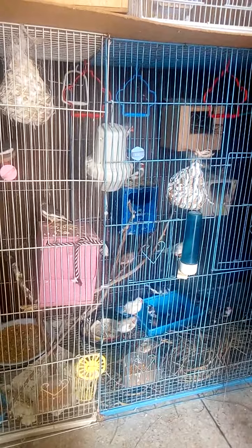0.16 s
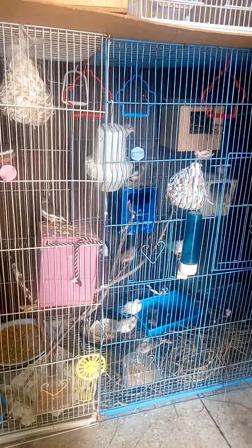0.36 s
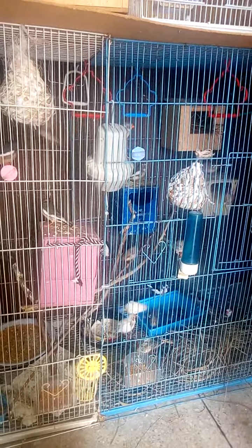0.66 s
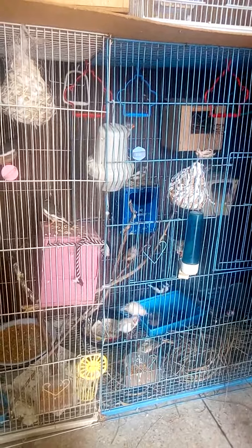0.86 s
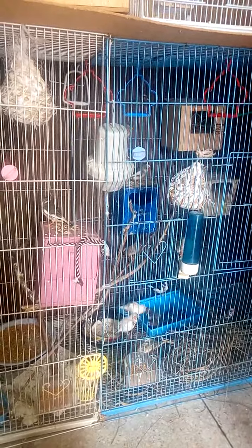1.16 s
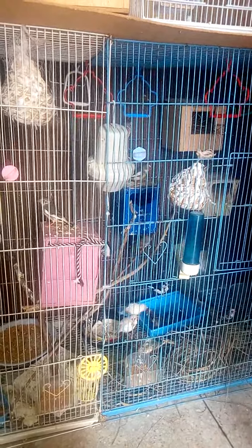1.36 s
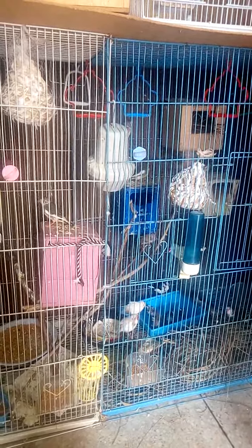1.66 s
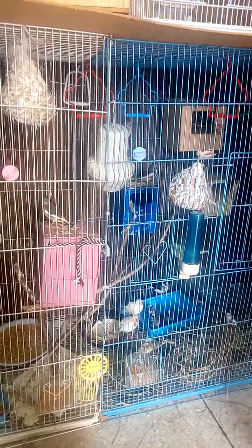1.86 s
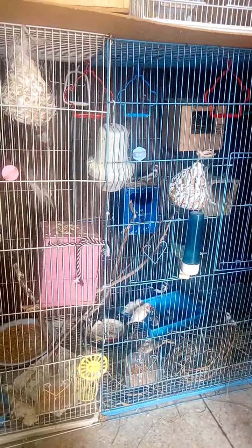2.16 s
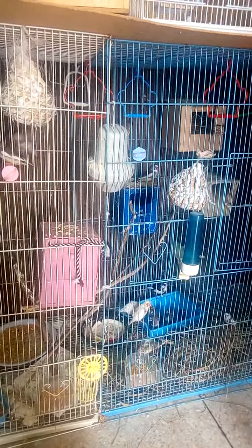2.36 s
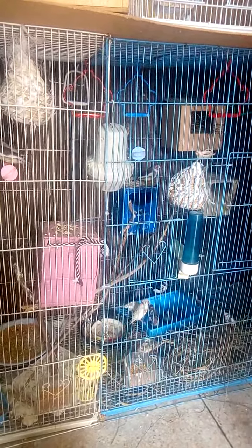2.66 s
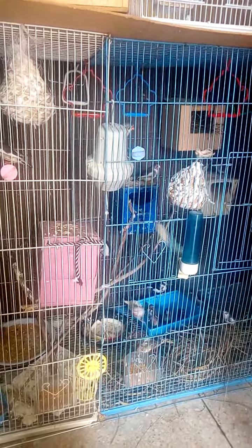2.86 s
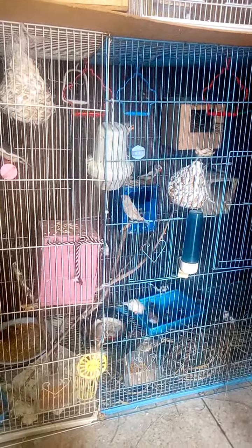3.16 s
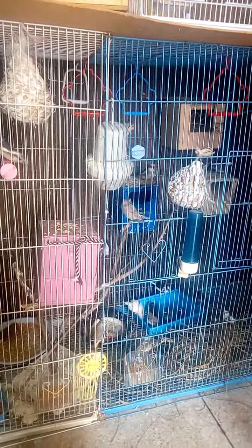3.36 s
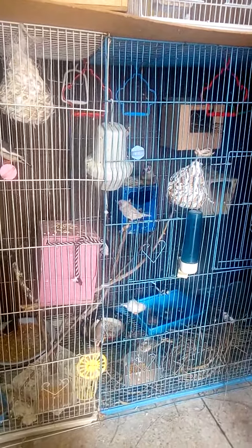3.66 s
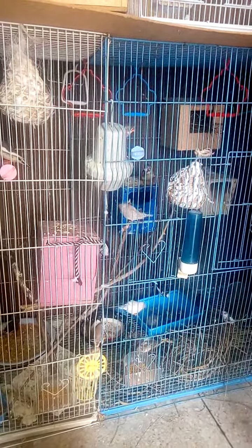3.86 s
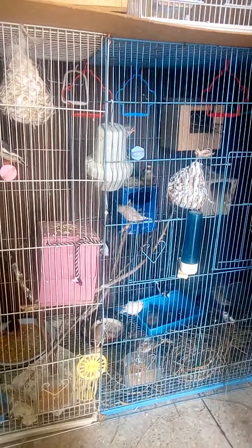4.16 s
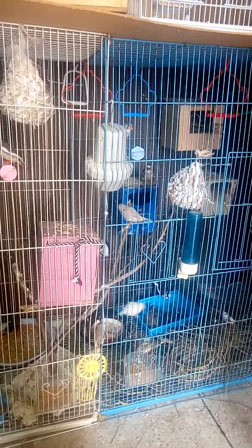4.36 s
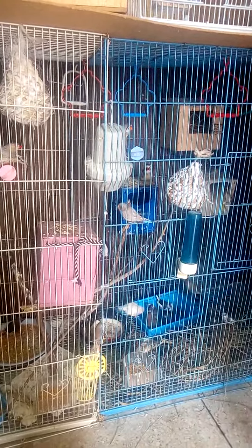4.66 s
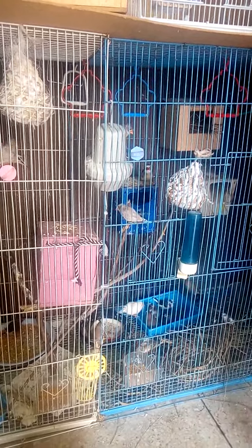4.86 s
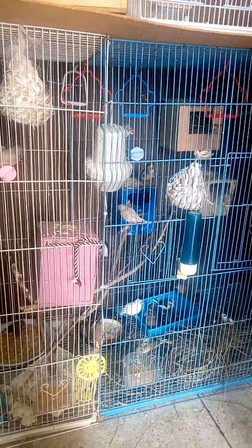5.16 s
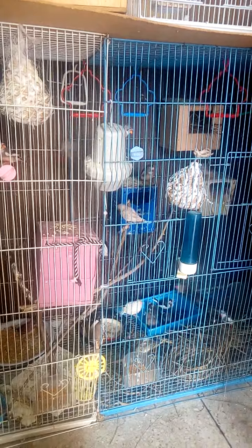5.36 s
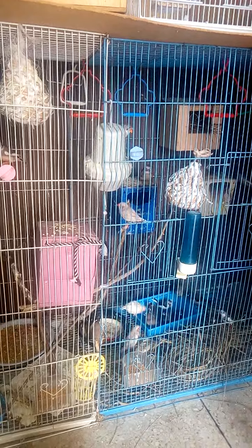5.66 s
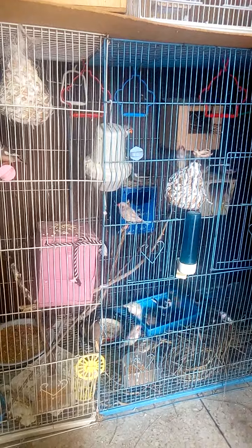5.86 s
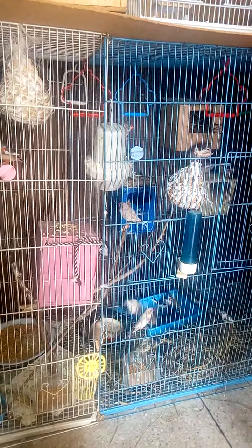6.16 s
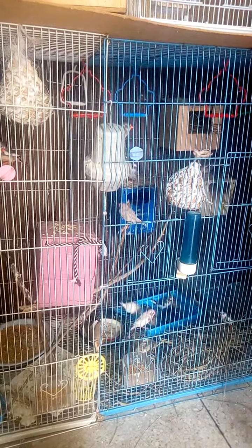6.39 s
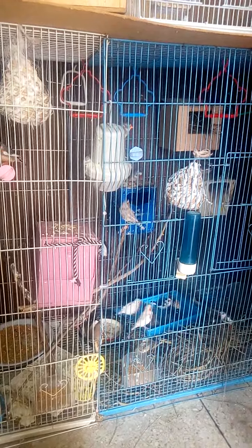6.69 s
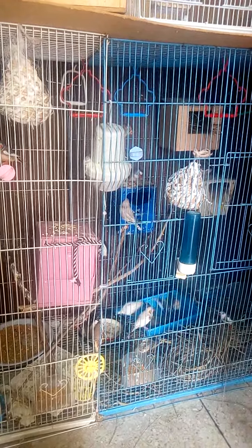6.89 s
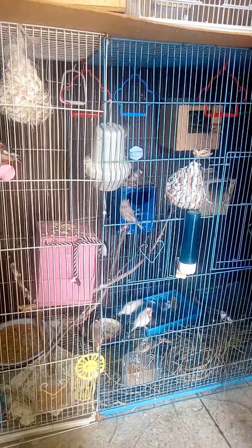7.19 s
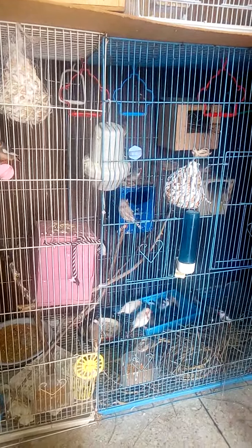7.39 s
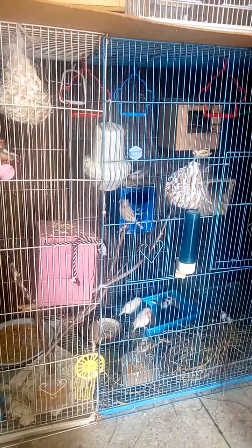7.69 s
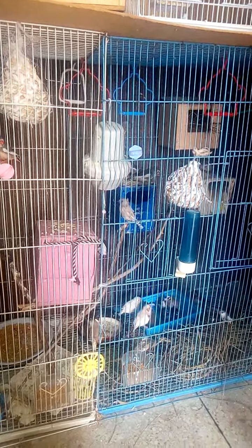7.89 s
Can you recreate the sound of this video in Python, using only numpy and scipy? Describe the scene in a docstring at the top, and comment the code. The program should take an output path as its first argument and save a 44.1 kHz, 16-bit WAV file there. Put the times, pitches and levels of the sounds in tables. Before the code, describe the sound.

Small finches in wire cages chirp in quick bursts, whistle a repeated arched call, nasally beep and rasp in a small hard-floored echoing room.

```python
"""In a small hard-floored room, finches call in wire cages.
One repeats a long arched whistle; others chirp, warble, give soft nasal calls and scold in harsh rasps.
Voices are harmonic tones on moving pitches, with rasps and wheezes of coloured noise.
The cage ticks and thrums faintly as the birds hop about: dry cracks, ringing wires, low panel modes.
Faint twittering and a wing beat pass over quiet air noise, and short echoes surround the calls."""
import sys
import numpy as np
from scipy import signal
from scipy.fft import rfft, irfft
from scipy.io import wavfile
from scipy.ndimage import map_coordinates

SR = 44100
rng = np.random.default_rng(int(sys.argv[2]) if len(sys.argv) > 2 else 0)


def int16_out(signal):
    """Quantize to a 16-bit WAV file."""
    q = np.round(np.clip(np.atleast_2d(signal).T, -1, 1) * 32767)
    wavfile.write(sys.argv[1], SR, q.astype(np.int16))


N = 354123
TIME = np.arange(N) / SR


def from_db(db):
    """Decibels to gain."""
    return 10 ** (np.asarray(db) / 20)


def rms_one(x):
    """Scale to unit power."""
    return x / np.sqrt(np.mean(x ** 2) + 1e-20)


def add(out, s, sound):
    """Mix a sound in at time s."""
    at = max(round(s * SR), 0)
    out[at:at + len(sound)] += sound[:max(N - at, 0)]


def progress(length):
    """Share 0-1 of a note gone by at each sample."""
    return np.linspace(0, 1, int(length * SR))


def wander(size, rate):
    """Smooth random curve around 0 through rate chance values a second, each of unit spread."""
    points = rng.standard_normal(size=4096)
    return map_coordinates(points, [np.arange(size) * rate / SR], order=3, mode="mirror")


def gate(u, edge):
    """Soft opening and closing over a share edge of the note."""
    return np.sin(np.pi / 2 * np.clip(np.minimum(u, 1 - u) / edge, 0, 1)) ** 2


def noise(spectrum):
    """Noise of a given colour, drawn on a log frequency axis, rms 1."""
    hz, db = np.transpose(spectrum)
    bins_hz = np.arange(N // 2 + 1) * SR / N
    gain = from_db(np.interp(np.log(bins_hz + 1), np.log(hz), db))   # + 1 avoids log 0
    return rms_one(irfft(rfft(rng.standard_normal(N)) * gain, N))


def syrinx(hz, partials_db):
    """Voice of a bird: a harmonic tone on a pitch track, without partials above SR / 2, rms 1."""
    phase = 2 * np.pi * np.cumsum(hz) / SR
    tone = 0
    for k, db in enumerate(partials_db, 1):
        tone = tone + from_db(db) * np.sin(k * phase) * (k * hz < SR / 2)
    return rms_one(tone)


# colour of the still air: f/Hz, relative level/dB [dB per Hz]
AIR_COLOUR = [(18, -64.5), (30, -26.5), (150, -8), (807, -15), (4190, -16.5), (6530, -29), (9660, -35.5),
              (15500, -40.5)]


def air(level_db=-55.5):
    """Still air: a steady, quiet coloured noise."""
    return from_db(level_db) * noise(AIR_COLOUR)


# partials of a chirp at multiples of half the main pitch: level/dB, odd ones before the roughness
CHIRP_PARTIALS_DB = [-19.5, 1, -7, -33.5, -26, -46.5]


def chirp_tone(hz, rough, jitter_hz=700, trill_hz=62):
    """A rough syrinx trills, jitters, scratches and doubles its period, adding lines between harmonics."""
    jitter, trill, flutter = .02, .15, .38   # depths, the first two as shares of the pitch
    scratch_db, scratch_ratio, scratch_spread, scratch_hz = -12, .86, .15, 2500
    size = len(hz)
    halfway_db = 30 * np.log10(rough + 0.046)   # level change of the lines between the harmonics
    partials_db = [db + halfway_db * (k % 2) for k, db in enumerate(CHIRP_PARTIALS_DB, 1)]
    bend = jitter * wander(size, jitter_hz) + trill * np.cos(2 * np.pi * trill_hz * TIME[:size])
    tone = syrinx(hz / 2 * (1 + rough * bend), partials_db)
    # a tone with a fast ragged pitch turns to hiss
    scratch = syrinx(scratch_ratio * hz * (1 + scratch_spread * wander(size, scratch_hz)), [0])
    tone = tone + rough * from_db(scratch_db) * scratch
    return tone * (1 + flutter * rough * wander(size, jitter_hz))


# quick chirps: t/s, length [s], start f/Hz, goal f/Hz, level/dB, roughness [0-1]
CHIRPS = [(0.0, 0.0045, 3680, 2950, -26.5, 0.6), (0.528, 0.036, 3340, 3586, -17.5, 0.66),
          (0.563, 0.036, 4337, 3254, -15, 0.34), (0.6, 0.045, 3500, 2930, -23, 0.75),
          (1.034, 0.048, 3060, 3930, -25, 0.78), (1.061, 0.05, 2002, 3020, -23, 0.23),
          (1.111, 0.023, 2350, 2870, -22, 0.42), (1.541, 0.041, 4080, 4530, -33, 0.36),
          (1.59, 0.036, 5040, 4126, -16.5, 0.26), (1.611, 0.047, 2764, 3910, -16, 0.35),
          (1.669, 0.053, 5200, 3230, -18, 0.03), (2.522, 0.052, 3177, 3570, -26.5, 0.84),
          (2.556, 0.05, 3170, 2584, -29.5, 0.72), (3.004, 0.069, 4040, 3454, -32.5, 0.27),
          (4.429, 0.097, 1707, 1865, -37.5, 0), (5.596, 0.046, 3880, 2944, -31.5, 0.94),
          (5.767, 0.03, 6260, 5700, -44, 0.15), (5.795, 0.064, 4000, 3037, -28, 0.23),
          (6.78, 0.051, 5350, 4280, -29.5, 0.2), (6.865, .05, 2340, 3000, -44, .2),
          (6.912, 0.039, 6660, 4170, -35, 0.32), (7.173, 0.02, 4190, 3840, -25.5, 0.08),
          (7.199, 0.026, 5150, 4430, -25, 0.16), (7.227, 0.028, 2830, 4030, -16.5, 0.12),
          (7.294, 0.054, 2710, 3744, -20, 0.2), (7.298, 0.0089, 4880, 5580, -22, 0),
          (7.856, 0.03, 3280, 3680, -29, 0.48), (7.893, 0.028, 2583, 3273, -23.5, 0.65),
          (7.955, 0.018, 3384, 3319, -20.5, 0.14), (8.001, 0.042, 2290, 3630, -24, 0.14)]


def chirps(turn_share=.93):
    """Short notes that swoop up or down to a goal pitch, fast at first, and bend back a little."""
    out = np.zeros(N)
    for s, length, start_hz, goal_hz, db, rough in CHIRPS:
        u = progress(length)
        hz = goal_hz + (start_hz - goal_hz) * (1 - u / turn_share) ** 2
        add(out, s, from_db(db) * gate(u, edge=.2) * chirp_tone(hz, rough))
    return out


# colour of claws and seed husks: f/Hz, relative level/dB [dB per Hz]
TICK_COLOUR = [(600, -11.5), (2000, 6), (9000, -15.5), (15500, -21)]


def ticks(ticks_per_s=12, level_db=-47.5, spread_db=4, t60_s=.0033):
    """Claws and seed husks: tiny dry cracks of uneven size at random moments, each a burst of noise."""
    struck = rng.random(N) < ticks_per_s / SR
    cracks = struck * from_db(level_db + spread_db * rng.standard_normal(N))
    decay_per_sample = from_db(-60 / (t60_s * SR))
    # the tiny offset keeps the decay clear of vanishing numbers
    return signal.lfilter([1], [1, -decay_per_sample], cracks + 1e-18) * noise(TICK_COLOUR)


# low thrums of the cage panels: t/s, length [s], f/Hz, level/dB before the swells
THRUMS = [(.35, 0.5, 139.8, -56), (0.946, 0.5, 233.7, -52), (1.666, 0.3, 232, -51.5),
          (2.62, 0.53, 233, -54.5), (5.332, 0.38, 236, -51), (7.04, 0.29, 236.5, -53.5)]


def thrums(width_hz=50, overtone_db=-10):
    """Small shakes keep a low panel mode and a weaker neighbour ringing unevenly."""
    out = np.zeros(N)
    for s, length, hz, db in THRUMS:
        u = progress(length)
        for mode_hz, mode_db in [(hz, 0), (hz * 1.35, overtone_db)]:
            shake = wander(len(u), width_hz) + 1j * wander(len(u), width_hz)
            ringing = rms_one(np.real(shake * np.exp(2j * np.pi * mode_hz * u * length)))
            swells = from_db(4 * wander(len(u), 20.5))
            add(out, s, from_db(db + mode_db) * gate(u, 0.23) * swells * ringing)
    return out


# soft nasal calls: t/s, length [s], level/dB, brightest f/Hz, pitch f/Hz before arch and sag
NASAL_CALLS = [(0.664, 0.12, -38.5, 3920, 539), (0.826, 0.13, -38.5, 3060, 558),
               (1.311, 0.097, -38.5, 3270, 553), (2.694, 0.059, -35, 4700, 644.4),
               (2.87, 0.15, -40, 3270, 492), (3.304, 0.087, -30.5, 2650, 495.4),
               (3.611, 0.076, -41.5, 3570, 516.6), (4.867, 0.15, -26, 3560, 571.6),
               (5.954, 0.116, -38, 4260, 556.5), (6.421, 0.05, -29, 4380, 604.5),
               (6.492, 0.25, -32.5, 4530, 630.4), (6.684, 0.14, -25.5, 4530, 687),
               (7.034, 0.094, -28.5, 4280, 607)]


def nasal_calls(slope_db=15, beak_hz=5400, beak_cut_db=70):
    """Low-pitched harmonic stacks arch and sag, rough at both ends, shaped by one broad throat resonance."""
    out = np.zeros(N)
    arch, sag, jitter, uneven_db = .1, .07, .04, 4   # the first three scale shares of the pitch
    for s, length, db, bright_hz, pitch_hz in NASAL_CALLS:
        u = progress(length)
        ends = (2 * u - 1) ** 2   # 1 at both ends, 0 in the middle
        roughness = jitter * (ends + .2) * wander(len(u), 900)
        hz = pitch_hz * (1 - arch * ends - sag * (u - .5) + roughness)
        lines = pitch_hz * np.arange(1, 19)
        # slopes in dB per octave: around the resonance, then the extra cut above beak_hz
        shape = -slope_db * np.abs(np.log2(lines / bright_hz))
        shape = shape - beak_cut_db * np.maximum(np.log2(lines / beak_hz), 0)
        shape = shape - 25 * np.maximum(np.log2(1600 / lines), 0)   # a tiny throat radiates little bass
        partials_db = [level + uneven_db * wander(len(u), 2 / length) for level in shape]
        add(out, s, from_db(db) * gate(u, edge=.38) * syrinx(hz, partials_db))
    return out


# feet and beaks on the cage: t/s, level/dB before the mode levels
TAPS = [(0.971, -35), (1.971, -27.5), (2.529, -36)]
# ringing modes of the cage wires: f/Hz, mean level/dB, t60 [s]
WIRE_MODES = [(1480, -23, 0.014), (1840, 6, 0.026), (2030, 6.5, 0.017), (3350, 7, 0.031)]


def taps(wire_low_hz=1070):
    """Each touch of foot or beak rings the wires, every mode with a chance strength and its own decay."""
    out, t = np.zeros(N), TIME[:SR // 5]
    for s, db in TAPS:
        for hz, mode_db, t60 in WIRE_MODES:
            ring_db = db + mode_db + rng.normal(0, 2.9) - 60 * t / t60
            add(out, s, from_db(ring_db) * np.sin(2 * np.pi * hz * t))
    # thin wires radiate little bass
    return signal.sosfilt(signal.butter(2, wire_low_hz, "high", fs=SR, output="sos"), out)


def puffs(rows, colour):
    """Soft swells of rushing air, from a throat or from wings."""
    push = np.zeros(N)
    for s, length, db in rows:
        add(push, s, from_db(db) * gate(progress(length), 0.19))
    return push * noise(colour)


# thin wheezy calls: t/s, length [s], level/dB
WHEEZES = [(1.17, 0.12, -44), (3.85, .17, -36.5)]
# wheeze colour: f/Hz, relative level/dB [dB per Hz]
WHEEZE_COLOUR = [(1200, -14.5), (3500, -4.5), (5400, 13), (8500, -34)]


def wheezes():
    """Thin breaths through a throat, noise without a pitch."""
    return puffs(WHEEZES, WHEEZE_COLOUR)


# harsh scolds: t/s, length [s], level/dB before swell and grain, mean throat resonance f/Hz
RASPS = [(1.722, 0.041, -27.5, 6160), (1.87, 0.035, -32, 6030), (1.975, 0.08, -28.5, 5600),
         (2.11, 0.094, -31.5, 5460), (2.224, 0.099, -27.5, 5560), (2.359, 0.056, -27, 5200),
         (4.762, 0.084, -28, 5270), (5.205, 0.069, -29, 3970), (5.321, 0.061, -28.5, 3700),
         (7.68, 0.1, -30, 4800)]
# rasp hiss colour: f/Hz, relative level/dB [dB per Hz]
RASP_COLOUR = [(900, -57), (1650, -22.5), (2390, -17), (3620, -7), (4760, -6), (6800, -11.5), (7850, -24),
               (11500, -29), (15500, -40)]


def rasps(swell_db=10, throat_db=-3, throat_width_hz=1100, treble_hz=7600):
    """Grainy hisses swell and fade; effort lifts the throat resonance and lets the treble out at its height."""
    out, hiss = np.zeros(N), noise(RASP_COLOUR)
    treble = signal.sosfiltfilt(signal.butter(8, treble_hz, "high", fs=SR, output="sos"), hiss)
    grain_db, grain_hz, lift = 5, 330, .2
    for s, length, db, throat_hz in RASPS:
        u = progress(length)
        during = int(s * SR) + np.arange(len(u))
        effort = np.sin(np.pi * u ** 1.2)
        push_db = db + swell_db * (effort - 0.5) + grain_db * wander(len(u), grain_hz)
        push = gate(u, 0.033) * from_db(push_db)
        resonance_hz = throat_hz * (1 + lift * (effort - effort.mean()))
        phase = 2 * np.pi * np.cumsum(resonance_hz) / SR
        # two random curves spread the resonance into a band of noise
        ringing = wander(len(u), throat_width_hz) * np.sin(phase)
        ringing = ringing + wander(len(u), throat_width_hz) * np.cos(phase)
        breath = hiss[during] - (1 - effort ** 2) * treble[during]
        add(out, s, push * (breath + from_db(throat_db) * ringing) / np.sqrt(2))
    return out


# wing beats: t/s, length [s], level/dB
WINGS = [(1.945, 0.063, -45.5)]
# wing colour: f/Hz, relative level/dB [dB per Hz]
WING_COLOUR = [(200, -3), (400, -9), (900, -2), (9000, -55)]


def wings():
    """A wing beat pushes a soft, dull swell of air."""
    return puffs(WINGS, WING_COLOUR)


# arched whistles: t/s, length [s], top f/Hz, level/dB before the effort
WHISTLES = [(1.97, 0.25, 3093, -19.5), (3.041, 0.28, 3027, -19), (4.058, 0.26, 1804, -40),
            (4.123, 0.26, 3122, -18.5), (4.916, 0.25, 3010, -19.5), (6.143, .268, 3060, -18.5),
            (7.343, 0.27, 3046, -19), (7.708, 0.19, 2037, -28.5)]
# effort through a whistle: share of the call [0-1], level/dB
WHISTLE_EFFORT = [(0, -20), (.12, -0.5), (.35, 2.5), (.85, 2), (1, -9)]
# beak colour of the overtones: f/Hz, level/dB relative to the fundamental, before effort and flicker
BEAK_COLOUR = [(3600, -4.5), (5600, -25), (6200, -36), (9000, -63.5), (12000, -51), (15000, -73.5)]


def whistles(quaver_hz=350, release_s=0.02, rise_power=1.8, brightening=1.7, breath_db=-21, flicker_db=4):
    """The pitch climbs, sinks and drops hoarsely as pressure lets go; deep calls have a more pointed top."""
    out = np.zeros(N)
    rise_share, start_ratio, sag_hz = .61, .595, 386   # climb time, first over top pitch, loss after the top
    quaver, release_drop, usual_top_hz = .006, .18, 3050
    for s, length, top_hz, db in WHISTLES:
        u = progress(length)
        rise = rise_share * length
        t, fall = u * length - rise, length - rise   # t is 0 at the top
        roundness = rise_power * top_hz / usual_top_hz
        climb_hz = top_hz * (1 - start_ratio) * np.abs(t / rise) ** roundness
        sink_hz = sag_hz * np.abs(t / fall) ** roundness
        release = np.clip((t - fall) / release_s + 1, 0, 1)
        hz = (top_hz - np.where(t < 0, climb_hz, sink_hz)) * (1 - release_drop * release)
        effort_db = np.interp(u, *np.transpose(WHISTLE_EFFORT))
        # a weakly blown tone is less steady
        hz = hz * (1 + quaver * wander(len(u), quaver_hz) / from_db(effort_db))
        # the beak colours the overtones, which flicker; effort brings out the high ones
        overtones_db = []
        for k in range(2, 6):
            beak_db = np.interp(k * hz, *np.transpose(BEAK_COLOUR))
            flicker = flicker_db * wander(len(u), quaver_hz)
            overtones_db.append(beak_db + brightening * (k - 2) * effort_db + flicker)
        tone = from_db(effort_db) * syrinx(hz, [0] + overtones_db)
        # a ragged octave fades on the way up and returns at the release
        octave = syrinx(2 * hz * (1 + .05 * wander(len(u), 900)), [0])
        hoarse = octave * from_db(breath_db) * (np.clip(-t / rise, 0, 1) + release / 2)
        add(out, s, from_db(db) * gate(u, edge=.03) * (tone + hoarse))
    return out


# spells of faint twittering at the back of the cages: from t/s, to t/s, level/dB
TWITTER = [(2.743, 2.88, -45), (3.993, 4.17, -40), (4.418, 4.76, -39.5), (5.976, 6.15, -35),
           (6.721, 6.96, -34.5), (7.181, 7.32, -27.5)]


def twitter(pitch_hz=3300, note_s=.04, spacing_s=.045):
    """Tiny chirps at loosely spaced moments, each gliding its own way."""
    out, u = np.zeros(N), progress(note_s)
    for start, end, db in TWITTER:
        for s in np.arange(start, end, spacing_s):
            late, height, glide = rng.uniform(-0.9, 0.54, 3)   # height and glide in octaves
            hz = pitch_hz * 2 ** (height + glide * (u - .5))
            add(out, s + late * .03, from_db(db) * gate(u, .5) * chirp_tone(hz, rough=.35))
    return out


# the warble: t/s, length [s], turn rate [turns per s]
WARBLE = (6.455, .32, 21.2)


def warble(centre_hz=2900, swing_hz=595, rise_share=.59, level_db=-26.5):
    """A quick run of notes, each sweeping up to a loud crest and breaking off; no two quite alike."""
    s, length, turns = WARBLE
    out, u = np.zeros(N), progress(length)
    turn = turns * length * u % 1
    swing = signal.sawtooth(2 * np.pi * turn, rise_share)
    hz = centre_hz + swing_hz * swing + 130 * wander(len(u), turns)
    push = (1.5 + swing) / 2 * gate(turn / .9, .15)   # silent for the last tenth of each turn
    add(out, s, from_db(level_db) * push * chirp_tone(hz, rough=.06))
    return out


# reflections off floor, shelf and wall: delay t/s, level/dB relative to the direct sound
ECHOES = [(.0031, -5), (.0074, -9.5), (0.0141, -10.5)]


def room(x, tail_db, t60=0.26, treble_t60=0.11, build_s=0.0034):
    """A few near reflections, then a dense tail whose treble dies first; the response has unit energy."""
    t = TIME[:SR // 2]
    white = rng.standard_normal(len(t))
    low = signal.sosfiltfilt(signal.butter(2, 6000, fs=SR, output="sos"), white)
    tail = low * from_db(-60 * t / t60) + (white - low) * from_db(-60 * t / treble_t60)
    tail = tail * (1 - np.exp(-t / build_s))
    response = from_db(tail_db) * tail / np.linalg.norm(tail)
    response[0] += 1   # direct sound
    for delay, db in ECHOES:
        response[int(delay * SR)] += from_db(db)
    return signal.fftconvolve(x, response / np.linalg.norm(response))[:N]


def scene():
    """The warbler perches nearest, then chirpers and whistler, the others farther into the room, over still air."""
    nearest = room(ticks() + taps() + warble(), tail_db=-7.5)
    middle = room(chirps(), tail_db=2.5) + room(whistles(), tail_db=3.0)
    flock = nasal_calls() + wheezes() + rasps() + wings() + twitter()
    far = room(flock, tail_db=3.0, t60=0.29, treble_t60=0.14)
    return (nearest + middle + far + thrums() + air())[None]


def record(dry):
    """A steep low-pass cuts the top off above 15450 Hz."""
    return signal.sosfilt(signal.ellip(10, .1, 80, 15450, fs=SR, output="sos"), dry)


dry = scene()
out = record(dry)
int16_out(out)
```